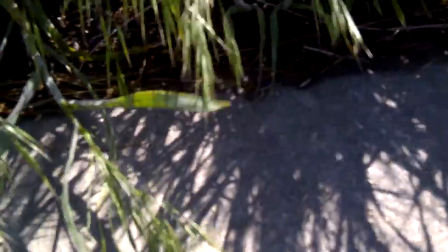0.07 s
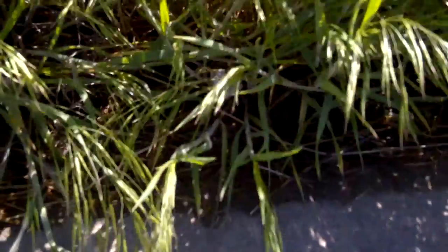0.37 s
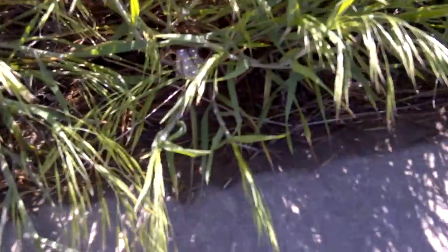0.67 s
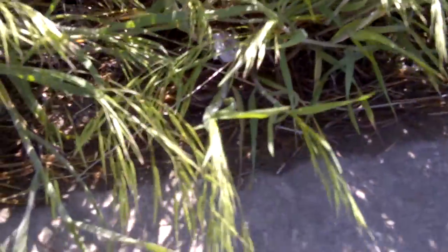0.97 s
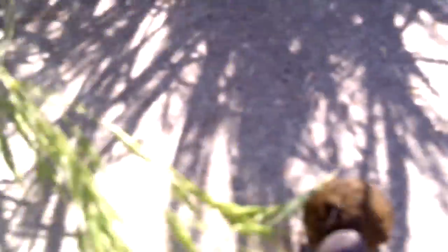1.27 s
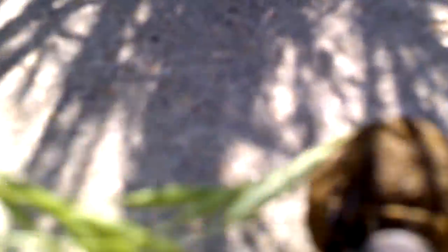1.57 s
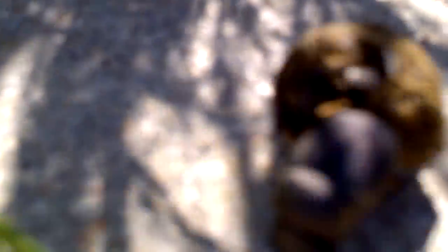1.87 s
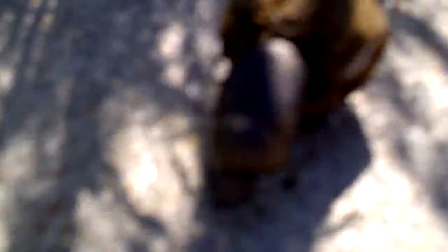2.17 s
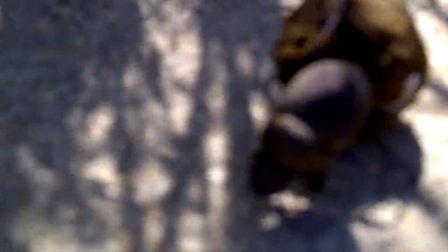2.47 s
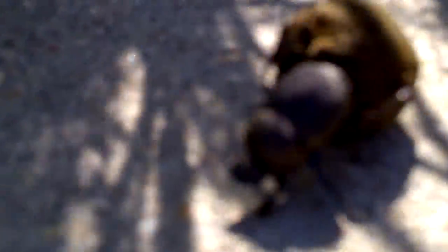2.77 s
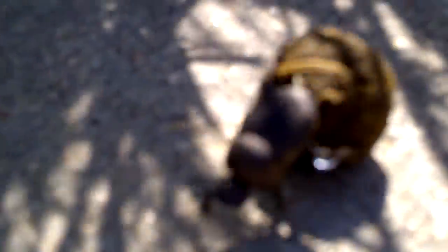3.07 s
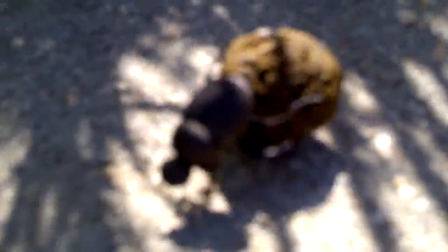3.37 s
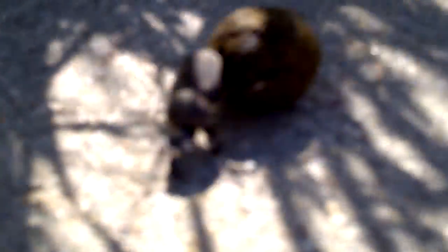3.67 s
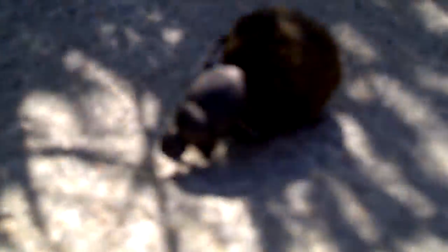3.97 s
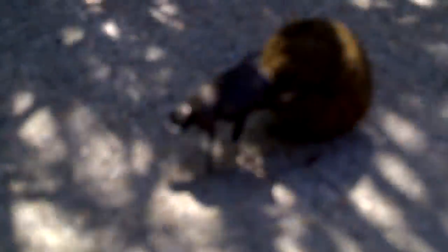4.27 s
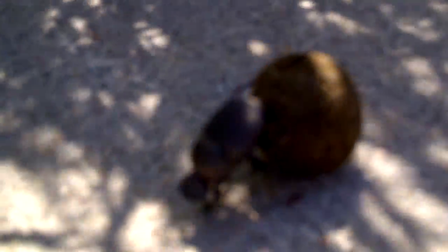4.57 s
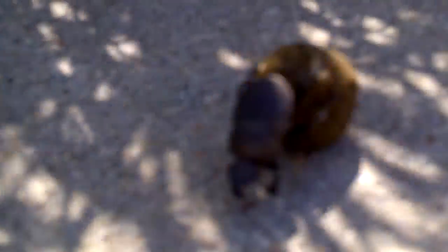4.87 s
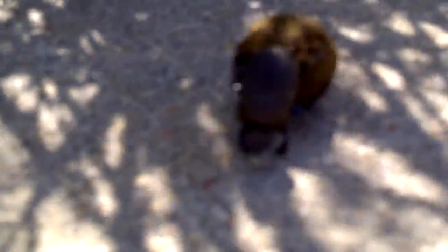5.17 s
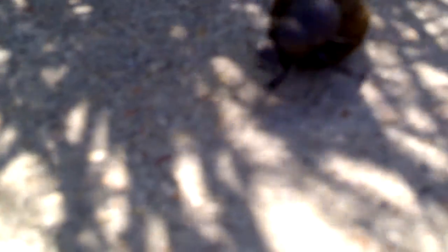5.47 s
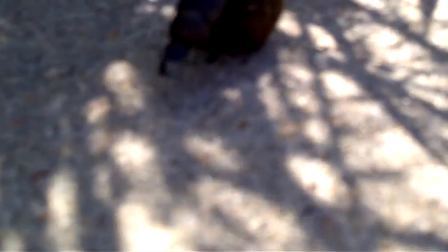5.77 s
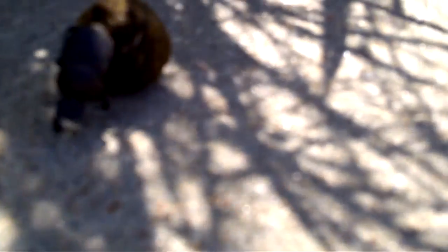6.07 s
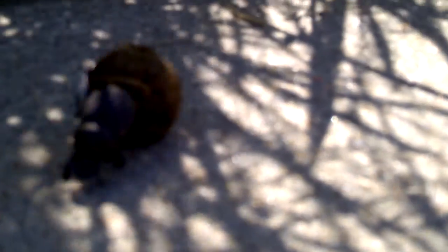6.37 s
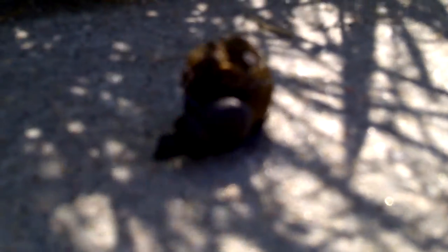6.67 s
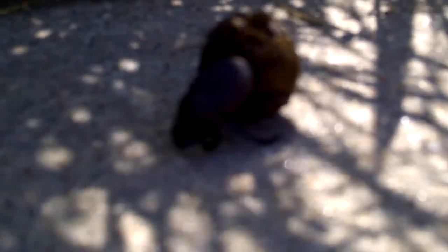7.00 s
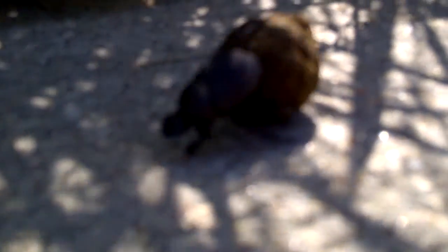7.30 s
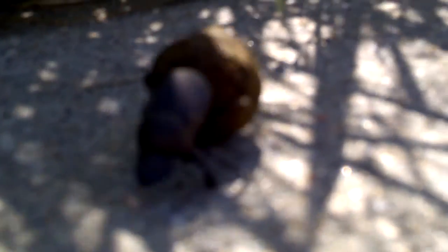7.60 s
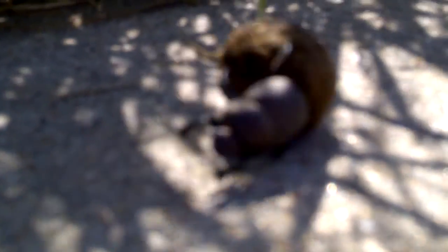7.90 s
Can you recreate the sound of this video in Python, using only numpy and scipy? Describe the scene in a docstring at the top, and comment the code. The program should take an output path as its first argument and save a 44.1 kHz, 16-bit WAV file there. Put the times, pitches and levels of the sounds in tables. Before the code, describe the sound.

Fingers click and bump on a hand-held camera over a quiet outdoor rumble, with faint rasping bird calls far away.

```python
"""Fingers bump, click and rub on a hand-held camera, making its plastic case ring and rock.
The knocks crowd the first two seconds or so; most of the rubbing comes near the end.
Dry stems and grit beside a quiet path brush and tick now and then, in bursts of grainy noise.
Far birds rasp, settling at about three calls a second, and a faint thin tone comes and goes.
Behind it all lie a low drone, a soft outdoor rumble and microphone hiss."""
import sys
import numpy as np
from scipy import signal
from scipy.fft import rfft, irfft
from scipy.io import wavfile
from scipy.ndimage import uniform_filter1d

SR = 44100
rng = np.random.default_rng(int(sys.argv[2]) if len(sys.argv) > 2 else 0)


def to_wav(s):
    """Save 16-bit WAV."""
    ch = np.atleast_2d(s).T  # columns
    pcm = np.round(np.clip(ch, -1, 1) * 32767)  # PCM
    wavfile.write(sys.argv[1], SR, pcm.astype(np.int16))


N = 354563
T = np.arange(N) / SR


def undb(db):
    """Turn decibels into a number to multiply by."""
    return 10 ** (np.asarray(db) / 20)


def level(x, db):
    """Scale a sound to an average (rms) level."""
    return x * undb(db) / np.sqrt(np.mean(x ** 2))


def add(out, start_s, x):
    """Mix a short sound in at a given time."""
    at = int(round(start_s * SR))
    lo, hi = max(at, 0), min(at + len(x), N)
    out[lo:hi] += x[lo - at:hi - at]


def keep_side(x, hz, side):
    """Keep the "low" or the "high" side of a frequency."""
    return signal.sosfilt(signal.butter(2, hz, side, fs=SR, output="sos"), x)


def resonate(x, hz, width_hz):
    """Keep a band around one frequency."""
    return signal.lfilter(*signal.iirpeak(hz, hz / width_hz, fs=SR), x)


def wander(rate_hz):
    """A smooth random curve with a typical size of one."""
    hold = int(SR / rate_hz)
    steps = np.repeat(rng.standard_normal(N // hold + 1), hold)
    smooth = uniform_filter1d(uniform_filter1d(steps, hold), hold)
    return level(smooth[:N], 0)


def span(x, start_s, length_s):
    """Cut a short piece from a long sound."""
    at = int(np.clip(start_s, 0, N / SR - length_s) * SR)
    return x[at:at + int(length_s * SR)]


def case_ring(length_s=.06):
    """One sharp push makes the plastic case ring with several fast-fading tones."""
    # the case's own tones: f/Hz, time to fade by 60 dB/s, relative level/dB
    tones = [(395, .030, 0), (520, .016, 4), (940, .020, -8.5), (1110, .014, -1.5), (1270, .012, -9.5),
             (1900, .005, -2), (2450, .008, -8), (3300, .004, -5.5), (4730, .005, -4.5), (5350, .004, -39),
             (6760, .005, -15.5), (8060, .004, -47), (10800, .002, -31), (13200, .002, -42)]
    t = T[:int(length_s * SR)]
    return sum(undb(db - 60 * t / fade_s) * np.sin(2 * np.pi * hz * t) for hz, fade_s, db in tones)


def finger_knocks():
    """A hard edge rings the case's high tones, a soft fingertip only the low ones."""
    # fingers hitting the case: t/s, peak level/dB, lowest f/Hz, highest f/Hz
    contacts = [(.1355, -39.5, 900, 6000), (.3020, -47.5, 600, 1400), (.4430, -41.5, 200, 600),
                (.6575, -39, 200, 800), (.7395, -45, 400, 1100), (.7729, -20, 4200, 12000),
                (.7738, -9.5, 2200, 9000), (.7743, -4, 150, 2600), (.8830, -49, 600, 1500),
                (.8910, -42.5, 300, 1000), (1.0528, -27.5, 120, 800), (1.0830, -41, 150, 800),
                (1.3243, -34.5, 250, 650), (1.3585, -23.5, 300, 480), (1.3738, -25.5, 330, 620),
                (1.4030, -42.5, 900, 1300), (1.5260, -44, 200, 650), (1.6380, -48, 600, 2500),
                (2.1290, -43, 300, 600), (2.2597, -42, 400, 1700), (7.2650, -46, 350, 600)]
    out, ring = np.zeros(N), case_ring()
    for start_s, db, low_hz, high_hz in contacts:
        hit = keep_side(keep_side(ring, low_hz, "high"), high_hz, "low")
        add(out, start_s, hit * undb(db) / np.abs(hit).max())
    return out


def hand_bumps(rise_s=.002):
    """The whole camera rocks briefly in the hand, giving a low thud."""
    # soft bumps: t/s, peak level/dB, f/Hz, time to fade by 60 dB/s
    bumps = [(.150, -42.5, 80, .15), (.180, -39.5, 75, .14), (.222, -42, 85, .12), (.246, -34.5, 160, .035),
             (.431, -33, 105, .07), (.440, -31, 170, .035), (.452, -27.5, 70, .07), (.464, -36.5, 160, .04),
             (.503, -40.5, 90, .1), (.528, -45, 170, .05), (.580, -45, 150, .07), (.612, -34.5, 150, .04),
             (.6215, -24.5, 150, .03), (.668, -35, 160, .04), (.680, -40, 45, .1), (.776, -39.5, 75, .07),
             (.875, -49, 60, .07), (.960, -43, 55, .08), (1.056, -40, 110, .05), (1.190, -45, 55, .1),
             (1.235, -46, 70, .07), (3.606, -42.5, 52, .1), (3.670, -48, 70, .08), (3.726, -42.5, 62, .09)]
    out, t = np.zeros(N), T[:SR // 4]
    rise = 1 - np.exp(-t / rise_s)
    for start_s, db, hz, fade_s in bumps:
        thud = np.sin(2 * np.pi * hz * t) * rise * undb(-60 * t / fade_s)
        add(out, start_s, thud * undb(db) / np.abs(thud).max())
    return out


def grip_rubs(grain_db=3, muffle_hz=1500):
    """Skin slips in tiny steps, and each step rings the case."""
    # the grip sliding: t/s, length/s, average level/dB
    slides = [(1.95, .22, -69), (7.18, .13, -62), (7.40, .15, -59.5), (7.52, .11, -58), (7.94, .14, -61)]
    slips = rng.standard_normal(N) * undb(grain_db * rng.exponential(size=N))
    ringing = signal.fftconvolve(slips, case_ring())[:N]
    muffled = keep_side(ringing, muffle_hz, "low")
    out = np.zeros(N)
    for start_s, length_s, db in slides:
        rub = span(muffled, start_s, length_s)
        add(out, start_s, level(rub * signal.windows.tukey(len(rub), .5), db))
    return out


def stem_brushes(grain_db=4.5, rise_share=.15):
    """Dry stems and grit brush in a spray of tiny ticks that starts quickly and fades."""
    # brushes: t/s, length/s, average level/dB, centre f/Hz, band width/Hz
    brushes = [(.795, .03, -62.5, 3000, 3000), (.855, .05, -65, 2800, 3500), (1.16, .09, -68.5, 3000, 4000),
               (1.722, .045, -62, 4200, 5000), (1.728, .09, -58, 1400, 900), (1.768, .025, -68, 7000, 7000),
               (1.86, .05, -65.5, 1300, 1300), (2.106, .018, -63.5, 8500, 7000),
               (2.395, .05, -73, 8000, 2000), (2.464, .02, -65, 2300, 2500), (2.906, .018, -67, 9000, 5000),
               (2.925, .035, -71, 8500, 5000), (3.995, .05, -64, 1300, 1300),
               (4.517, .018, -62, 2800, 1100), (4.521, .04, -61, 1550, 600), (5.794, .025, -64, 2300, 3000),
               (6.160, .012, -69, 10000, 9000)]
    grains = rng.standard_normal(N) * undb(grain_db * rng.exponential(size=N))
    out = np.zeros(N)
    for start_s, length_s, db, hz, width_hz in brushes:
        burst = span(grains, start_s, length_s)
        progress = np.linspace(0, 1, len(burst))
        loudness = np.minimum(progress / rise_share, 1 - progress)
        add(out, start_s, level(resonate(burst * loudness, hz, width_hz), db))
    return out


def far_birds(flutter_hz=75, roughness=.35, throat_width_hz=520, echo_db=-11, echo_fade_s=.3):
    """Fluttering breath rings in a bird's throat; bushes on the way smear the rasp."""
    # rasping calls: t/s, length/s, average level before the echo/dB, centre f/Hz
    calls = [(-.02, .10, -62, 1450), (1.285, .14, -65, 1520), (2.62, .05, -70.5, 2250),
             (3.02, .07, -73, 2300), (3.43, .06, -69.5, 2250), (3.99, .13, -70, 2300),
             (4.335, .08, -67.5, 2330), (4.685, .10, -66, 2330), (5.0, .145, -66, 2380),
             (5.36, .12, -65.5, 2380), (5.73, .11, -67, 2350), (6.125, .11, -71, 2350),
             (6.52, .07, -70.5, 2330), (6.87, .125, -66.5, 2430), (7.195, .13, -65.5, 2380),
             (7.535, .14, -66, 2330), (7.905, .13, -66.5, 2380)]
    flutter = np.cos(2 * np.pi * np.cumsum(flutter_hz * undb(wander(30))) / SR)
    breath = rng.standard_normal(N) * (1 + roughness * flutter)
    out = np.zeros(N)
    for start_s, length_s, db, hz in calls:
        call = resonate(span(breath, start_s, length_s), hz, throat_width_hz)
        call = resonate(call, hz, throat_width_hz)  # a second pass narrows the band
        add(out, start_s, level(call * signal.windows.tukey(len(call), .4), db))
    t = T[:SR // 2]
    scatter = rng.standard_normal(len(t)) * undb(-60 * t / echo_fade_s)
    echo = signal.fftconvolve(out, scatter / np.linalg.norm(scatter))[:N]
    return out + undb(echo_db) * echo


def thin_pips(pitch_hz=2814, waver_db=-0.5):
    """A faint thin tone comes and goes, barely above the hiss."""
    # short tones: t/s, length/s, average level/dB
    pips = [(.81, .11, -76), (1.53, .12, -79), (2.03, .12, -75), (2.77, .14, -76), (3.27, .14, -74),
            (4.04, .14, -75.5), (4.54, .15, -75.5)]
    tone = np.sin(2 * np.pi * pitch_hz * T) * undb(waver_db * wander(25))
    out = np.zeros(N)
    for start_s, length_s, db in pips:
        pip = span(tone, start_s, length_s)
        add(out, start_s, level(pip * signal.windows.tukey(len(pip), .4), db))
    return out


def far_drone(waver_hz=30):
    """A low hum from far away wavers in pitch and loudness."""
    # the drone's course: t/s, f/Hz, average level/dB
    course = [(0, 100, -60), (1, 98, -63), (2, 98, -65), (2.55, 100, -58.5), (2.8, 115, -70),
              (4.2, 125, -71), (5.5, 120, -70.5), (8, 118, -74)]
    times, hz, db = np.transpose(course)
    phase = 2 * np.pi * np.cumsum(np.interp(T, times, hz)) / SR
    hum = wander(waver_hz) * np.cos(phase) + wander(waver_hz) * np.sin(phase)
    return level(hum, 0) * undb(np.interp(T, times, db))


def outdoor_air(base_db=-58.5, rumble_hz=180, hiss_hz=5000, rumble_flicker_db=1.74, middle_flicker_db=1.0):
    """Noise in three parts: a restless rumble, a slowly swelling middle, steady microphone hiss."""
    # tone colour of still air: f/Hz, relative level/dB
    colour = [(12, -34), (20, -2), (59, -2), (87, -5.5), (122, -0.5), (157, -6), (323, -8.5), (403, -11),
              (647, -14), (703, -15), (1160, -18), (2750, -23), (2990, -24), (13800, -31.5), (15400, -32)]
    # slow swell of the middle part: t/s, level change/dB
    swell = [(0, 1), (.8, 2.5), (1.8, 2), (2.3, 1), (3, -0.5), (4, 0.5), (5, 0), (6, -.5), (7, 1), (8, 1.5)]
    hz = np.maximum(np.arange(N // 2 + 1) * SR / N, 1)
    colour_hz, colour_db = np.transpose(colour)
    shape = undb(np.interp(np.log(hz), np.log(colour_hz), colour_db))
    noise = level(irfft(rfft(rng.standard_normal(N)) * shape, N), base_db)
    rumble = irfft(rfft(noise) / (1 + (hz / rumble_hz) ** 2), N)
    hiss = irfft(rfft(noise) / (1 + (hiss_hz / hz) ** 2), N)
    middle = noise - rumble - hiss
    swell_db = np.interp(T, *np.transpose(swell)) + middle_flicker_db * wander(8)
    return rumble * undb(rumble_flicker_db * wander(7)) + middle * undb(swell_db) + hiss


def scene():
    """Fingers close by and the outdoors behind them, in one channel."""
    handling = finger_knocks() + hand_bumps() + grip_rubs()
    outdoors = stem_brushes() + far_birds() + thin_pips() + outdoor_air() + far_drone()
    return (handling + outdoors)[None]


def record(dry):
    """The camera cuts off the highest treble."""
    top_hz = 15500
    return signal.sosfilt(signal.ellip(10, .1, 70, top_hz, fs=SR, output="sos"), dry)


dry = scene()
out = record(dry)
to_wav(out)
```